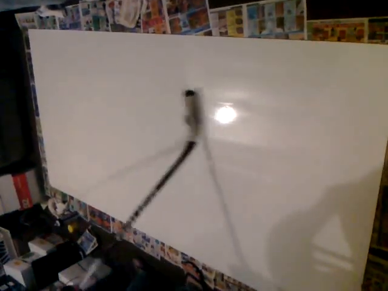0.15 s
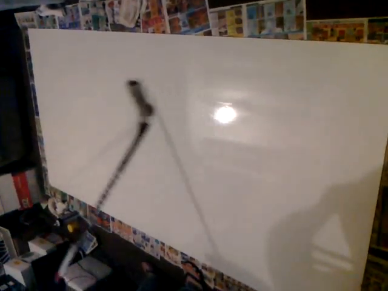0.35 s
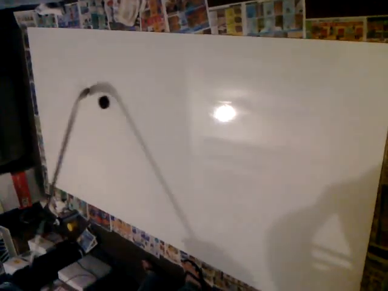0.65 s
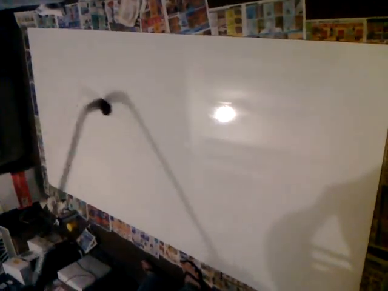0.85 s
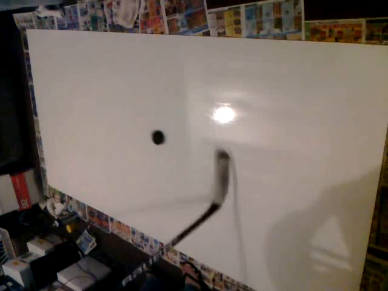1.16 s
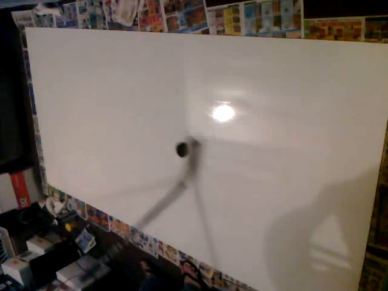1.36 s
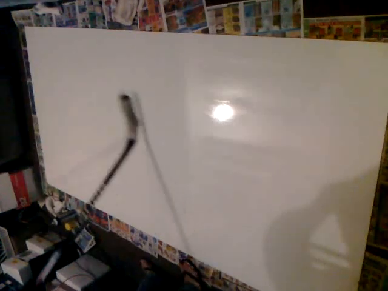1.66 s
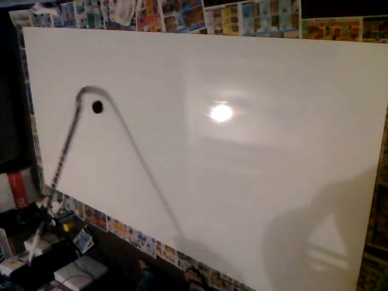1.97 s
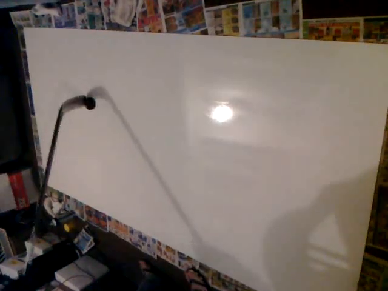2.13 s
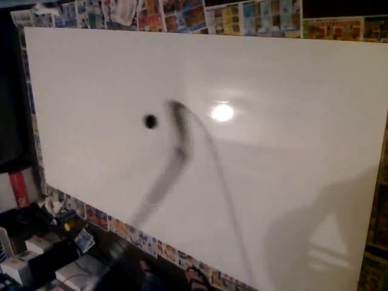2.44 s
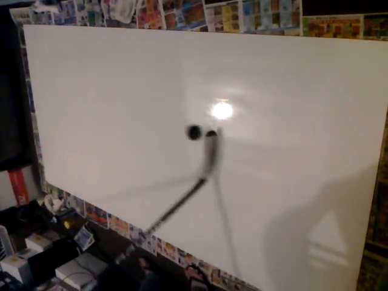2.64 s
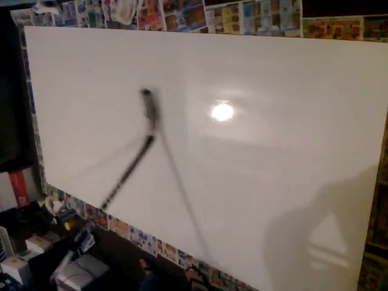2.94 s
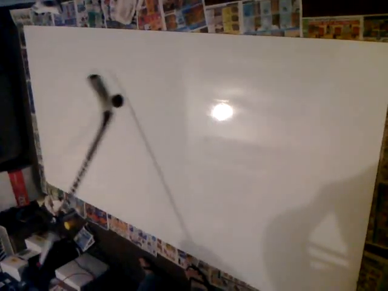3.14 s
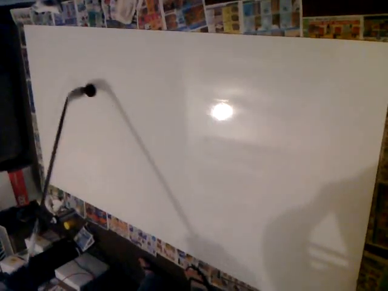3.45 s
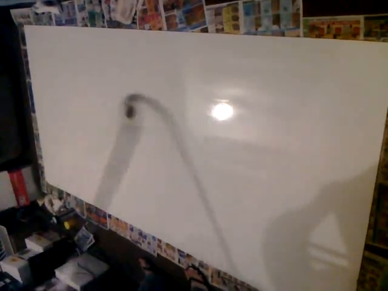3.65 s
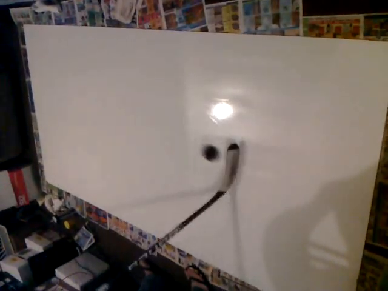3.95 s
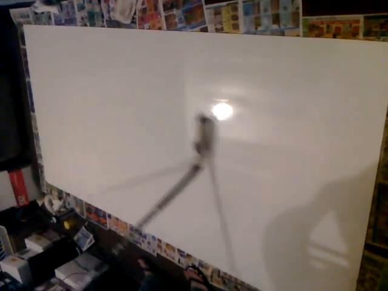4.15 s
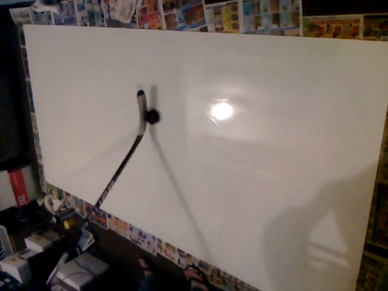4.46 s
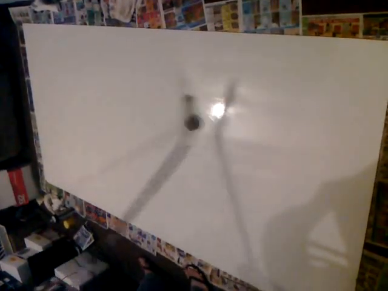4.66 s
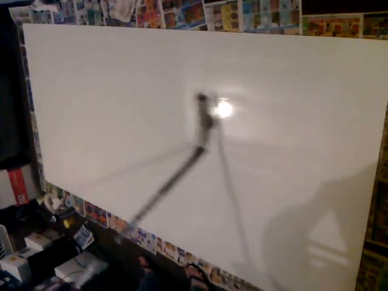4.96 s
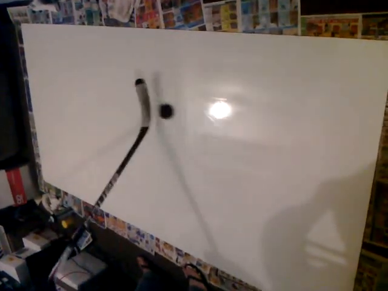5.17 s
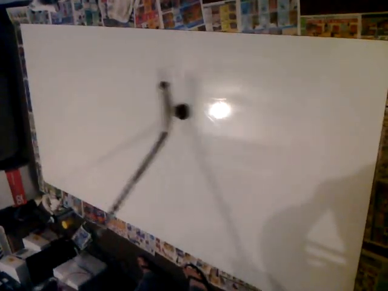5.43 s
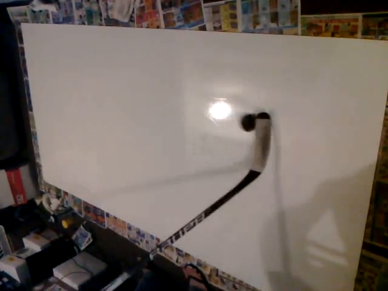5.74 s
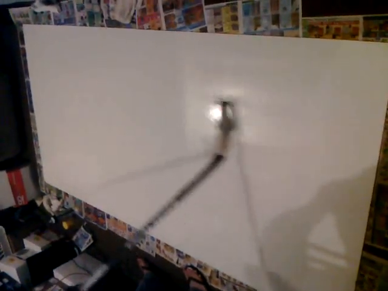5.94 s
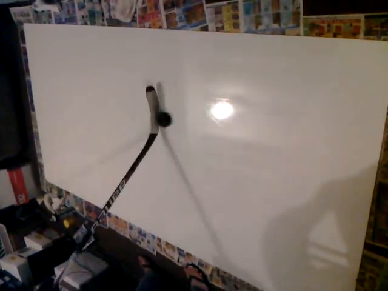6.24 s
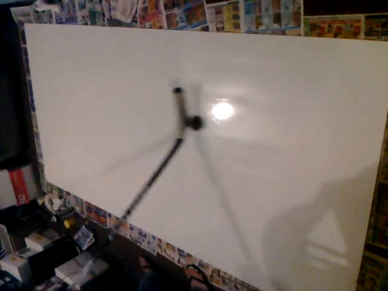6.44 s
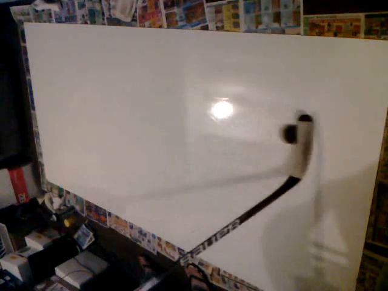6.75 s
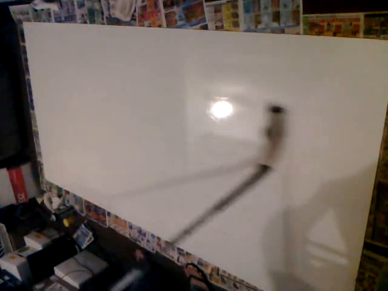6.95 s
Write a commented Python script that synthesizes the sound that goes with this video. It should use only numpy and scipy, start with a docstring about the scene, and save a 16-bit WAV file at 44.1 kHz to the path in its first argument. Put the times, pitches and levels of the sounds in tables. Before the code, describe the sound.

A hockey stick works a puck on a smooth practice board in a small room, over faint steady hiss and hum. Each hit is a low thump, woody clack and bright tick with a short room tail; puck knocks are slightly duller than board slaps, and some hits add a snap or tiny ring.

Hits open the scene and return around 0.6 and 0.8 seconds, followed by a gritty, hissing blade scrape near 1 second. A strong puck knock lands at 1.4, with more hits at 1.9, 2.2, 2.5, 2.7 and 3.4. The puck whispers faintly between them, and the blade scrapes around 2.4. Another scrape and a soft, deep board thud come near 3.6.

From 4 seconds the clacks come thicker, often in quick clusters, hardest at 4.4, 4.8 and 5.7. A pair follows at 6.3, and a final cluster just before 7 seconds.

```python
"""Stickhandling on a smooth practice board in a small room, over a faint hum and hiss.
The blade slaps the board, then knocks the puck: each blow is a low thump, a woody clack and a bright
tick with a short room tail. The blade's edge catches with a snap or a ring, the puck glides off, and
the blade scrapes after it in gritty friction. Now and then a heavy push flexes the board into a deep
thud. From about 4 s the blows come thicker, and the hardest slaps land."""
import sys
import numpy as np
from scipy import signal
from scipy.fft import rfft, irfft, next_fast_len
from scipy.io import wavfile
from scipy.ndimage import uniform_filter1d

SR = 44100
rng = np.random.default_rng(int(sys.argv[2]) if len(sys.argv) > 2 else 0)


def to_wav(sig):
    """Store sig (one row per channel, or 1-D mono) as 16-bit WAV at the path in sys.argv[1].

    Samples outside -1..1 are clipped; the rate is SR.
    """
    pcm = np.clip(np.atleast_2d(sig), -1, 1) * 32767
    pcm = np.round(pcm).astype(np.int16)
    wavfile.write(sys.argv[1], SR, pcm.T)  # frames by channels


N = 313110
BLOW = round(.32 * SR)   # samples in one blow with its tail

# Levels in the EQ curves and mode tables are relative: they set the colour only.
# room hiss: f/Hz, level/dB
HISS_EQ = [(20, -17), (60, -14.5), (130, -11.5), (180, -15), (250, -14), (380, -11), (900, -24),
           (3000, -30), (4500, -30), (7800, -24), (9500, -26.5), (11500, -38), (16000, -44)]
# mains hum and a thin electric whine: f/Hz, level/dB
HUM_TONES = [(59.6, -80), (119.5, -69.5), (15151, -87)]

# blade lands on the board: t/s, level/dB, softness (0-1), thump f/Hz
SLAPS = [(-0.006, -29, 0.25, 407), (0.6328, -29, 0.2, 425), (0.813, -36.5, 0.01, 387),
         (0.853, -38.5, 0.09, 410), (1.9053, -30.5, 0.12, 445), (2.2392, -35.5, 0.16, 428),
         (2.2685, -37, 0.2, 446), (2.465, -33, .27, 457), (3.3662, -26.5, 0.18, 413),
         (3.515, -31.5, 0.4, 380), (3.568, -34, 0.31, 350), (4.0897, -25, 0.65, 423),
         (4.2591, -53.5, 0.42, 424), (4.4242, -23.5, 0.33, 430), (4.651, -43, 1, 394),
         (4.657, -35.5, 0.9, 389), (4.668, -33, 0.51, 410), (4.756, -36.5, 0.46, 422),
         (4.768, -33.5, .6, 420), (4.8051, -20, 0.27, 419), (5.0209, -47.5, .95, 408),
         (5.2562, -25.5, 0.36, 444), (5.3417, -36.5, .9, 422), (5.486, -41.5, 0.32, 393),
         (5.4975, -33.5, 0.5, 380), (5.559, -41, 0.9, 413), (5.7155, -22, 0.27, 415),
         (6.2581, -28.5, .72, 448), (6.509, -44.5, 0.86, 413), (6.7676, -26, 0.36, 418),
         (6.8428, -31, 0.34, 390), (6.9064, -32.5, 0.45, 467)]
# woody body of a slap: f/Hz, level/dB
SLAP_CLACK_EQ = [(150, -16), (500, 4.5), (750, -0.5), (1050, -3), (1600, 0.5), (2200, -4), (2850, -9),
                 (3500, -5.5), (4600, -15), (8000, -17), (15000, -47)]
# bright attack of the blade: f/Hz, level/dB
BLADE_TICK_EQ = [(800, -19), (2500, 0.5), (3400, 2), (4800, -2), (6500, -0.5), (8400, 3), (9500, -1.5),
                 (11000, -10.5), (13000, -23), (16000, -33)]
# low resonances of board and room: f/Hz, level/dB, t60/s
BOARD_MODES = [(187.7, -7, 0.159), (283.8, -12.5, 0.34), (321, -2.5, 0.22), (356.8, -1, 0.29),
               (420, 2, 0.22), (450.5, -4.5, 0.2), (467.4, -1.5, 0.37), (486, -14, 0.52)]

# blade meets the puck: t/s, level/dB, thump f/Hz
PUCK_KNOCKS = [(0.1107, -31.5, 454), (0.813, -38, 640), (1.4358, -22.5, 543), (1.483, -34.5, 545),
               (2.1826, -39.5, 655), (2.7334, -25, 532), (2.798, -40.5, 540), (4.0585, -24.5, 494),
               (4.868, -28, 462), (5.2964, -28, 500), (5.8296, -31.5, 478), (5.906, -32.5, 445),
               (6.2933, -28.5, 627)]
# duller, woodier body of a knock: f/Hz, level/dB
KNOCK_CLACK_EQ = [(200, -18), (550, 4), (850, -6), (1250, 0.5), (1850, -1), (2500, -5.5), (3500, -6.5),
                  (5000, -13.5), (15000, -58.5)]
# attack of a knock: f/Hz, level/dB
KNOCK_TICK_EQ = [(1000, -3.5), (3000, -11), (4200, -5.5), (5200, -4.5), (7800, -1), (9300, -5.5),
                 (11000, -17), (16000, -30.5)]

# the blade's hard edge catches: t/s, level/dB, snap's share of the energy (0-1)
EDGE_CATCHES = [(0.1111, -69, 0.1), (0.813, -37.5, 0.54), (1.289, -59.5, .95), (1.344, -54, 1),
                (2.1867, -43.5, 0.93), (3.5686, -71, 0.64), (4.4245, -40, 0.44), (4.659, -44, 1),
                (4.7678, -49, .6), (5.8294, -53, 0), (6.842, -46.5, 0.4)]
# ring of the stiff blade: f/Hz, level/dB, t60/s
BLADE_MODES = [(900, -9, .1), (1642, -2, 0.17), (1760, 7, 0.106), (2050, -15, 0.16), (2300, -15, 0.14),
               (2970, 0.5, 0.082), (3530, -4, .07), (3670, 4, 0.087), (4280, -1, .08)]

# puck slides freely: start t/s, length/s, relative level/dB
PUCK_GLIDES = [(0.22, 0.099, -54.5), (1.33, 0.1, -50.5), (1.58, 0.28, -57), (2.095, 0.08, -54),
               (2.914, 0.14, -60), (5.043, 0.018, -64)]
# whisper of puck on board: f/Hz, level/dB
GLIDE_EQ = [(250, -23), (500, 5.5), (900, -8.5), (1500, -9), (3500, -16), (5800, -12.5), (8400, -8.5),
            (10500, -19), (14000, -38)]

# blade drags: start t/s, length/s, top speed t/s, relative pressure level/dB, relative hiss level/dB
BLADE_SCRAPES = [(0.887, 0.3, 1.035, -49.5, -42), (2.254, 0.13, 2.38, -51, -43.5),
                 (2.498, .04, 2.57, -50, -47.5), (3.531, 0.3, 3.72, -48.5, -43),
                 (5.052, .2, 5.19, -93, -59.5)]
# bright hiss of a scrape: f/Hz, level/dB
SCRAPE_HISS_EQ = [(3000, -9), (5000, -8.5), (7000, -5.5), (8400, -2), (9800, -8), (11400, -17.5),
                  (16000, -34.5)]
# coarse midrange grit of a scrape: f/Hz, level/dB
SCRAPE_GRIT_EQ = [(700, -18), (1050, -5), (1450, 1.5), (2100, -0.5), (2700, -3.5), (3600, -3.5),
                  (5000, -11.5), (8000, -33.5), (16000, -60)]
# board rumbling under a scrape: f/Hz, level/dB
SCRAPE_RUMBLE_EQ = [(60, -12.5), (130, -10.5), (220, -11), (330, 8), (490, 12), (700, 5.5), (950, -3),
                    (1400, -22), (4000, -70)]

# the whole board flexes under a heavy push: t/s, level/dB
BOARD_THUDS = [(1.436, -52), (3.617, -42.5), (4.062, -60)]


def from_db(db):
    """Decibels to gain."""
    return np.exp(np.asarray(db) * (np.log(10) / 20))


def eq_gains(eq, size):
    """An EQ curve as gains on an FFT grid, rolled off below its first point."""
    hz, db = np.transpose(eq)
    grid = np.maximum(np.arange(size // 2 + 1) * SR / size, 1)
    low_cut = np.minimum(grid / hz[0], 1) ** 2
    return low_cut * from_db(np.interp(np.log(grid), np.log(hz), db))


def noise(eq, grit_db=0):
    """Coloured noise at rms 1; grit breaks it into grains of uneven size."""
    size = next_fast_len(N, real=True)
    grains = rng.standard_normal(size) * from_db(grit_db * np.clip(rng.standard_normal(size), -3, 3))
    coloured = irfft(rfft(grains) * eq_gains(eq, size), size)[:N]
    return coloured / coloured.std()


def room_tone(hiss_db=-67):
    """The bed: steady hiss, mains hum and a thin electric whine."""
    t = np.arange(N) / SR
    hum = sum(np.sqrt(2) * from_db(db) * np.sin(2 * np.pi * (hz * t + rng.random()))
              for hz, db in HUM_TONES)
    return from_db(hiss_db) * noise(HISS_EQ) + hum


def add(track, s, sound):
    """Mixes a sound in at s seconds."""
    at = int(round(s * SR))
    part = sound[max(-at, 0):N - at]
    track[max(at, 0):max(at, 0) + len(part)] += part


def unit_blow(x):
    """Scales a blow to the energy of 20 ms at rms 1."""
    return x / np.sqrt(np.sum(x ** 2) / (SR / 50) + 1e-20)


def click(eq, size=2048):
    """The tightest transient with this colour: a minimum-phase click."""
    cepstrum = irfft(np.log(eq_gains(eq, size) + 1e-4))
    cepstrum[1:size // 2] *= 2
    cepstrum[size // 2 + 1:] = 0
    return irfft(np.exp(rfft(cepstrum)))


def thump(hz, spread, size=4096):
    """A heavily damped swing of the board; more spread makes it shorter."""
    band = np.array([1 / (1 + spread), 1 + spread]) * hz
    return signal.sosfilt(signal.butter(2, band, "band", fs=SR, output="sos"), signal.unit_impulse(size))


def in_room(pulse, wet_db, t60, build_s, uneven_db=0, wall_hz=11500, grain_hz=180):
    """The direct pulse and a wash of ringing and reflections, new for every spot on the board."""
    t = np.arange(BLOW) / SR
    hz = np.arange(BLOW // 2 + 1) * SR / BLOW
    # each contact point favours other resonances, and the walls swallow the very top
    favour = np.interp(hz / grain_hz, np.arange(BLOW), np.clip(rng.standard_normal(BLOW), -2, 2))
    colour = from_db(uneven_db * favour) / np.sqrt(1 + (hz / wall_hz) ** 6)
    wash = irfft(rfft(rng.standard_normal(BLOW)) * colour, BLOW)
    # early on, single reflections still stand out
    lumps = from_db(2.5 * np.exp(-t / 0.045) * np.clip(rng.standard_normal(BLOW), -3, 3))
    lumps /= np.sqrt(uniform_filter1d(lumps ** 2, size=200))
    echoes = wash * lumps * from_db(-60 * t / t60) * (1 - np.exp(-t / build_s))
    direct = unit_blow(np.pad(pulse, (0, BLOW - len(pulse))))
    wet = unit_blow(signal.fftconvolve(pulse, echoes)[:BLOW])
    return unit_blow(direct + from_db(wet_db) * wet)


def ring(modes, vary_db=3.0, build_s=0.002):
    """Decaying resonances; every blow wakes them with strengths and phases of its own."""
    t, tone = np.arange(BLOW) / SR, 0
    for hz, db, t60 in modes:
        decay = from_db(db + vary_db * rng.normal() - 60 * t / t60)
        tone += decay * np.sin(2 * np.pi * (hz * t + rng.random()))
    return unit_blow(tone * (1 - np.exp(-t / build_s)))


def blade_slaps(hardening=0.52, rebound_s=0.021, rebound_loss_db=21.5):
    """The flat of the blade slaps the board down: thump, clack and tick, then one weak rebound."""
    out, clack = np.zeros(N), click(SLAP_CLACK_EQ)
    for s, thump_db, softness, hz in SLAPS:
        # a soft landing loses clack, and still more tick
        clack_db = thump_db - 5 - 20 * softness
        tick_db = thump_db - 5 - 30.5 * softness
        # a harder blow has a shorter contact, so its tick is brighter
        db_per_octave = hardening * max(tick_db + 44.5, -6)
        pivot_hz = BLADE_TICK_EQ[0][0]
        tick = click([(f, db + db_per_octave * np.log2(f / pivot_hz)) for f, db in BLADE_TICK_EQ])
        swing = thump(hz, spread=0.37)
        low = in_room(swing, wet_db=-1.5, t60=0.23, build_s=0.0015) + from_db(-4.0) * ring(BOARD_MODES)
        mid = in_room(clack, wet_db=2.0, t60=0.34, build_s=0.00049, uneven_db=1.5)
        top = in_room(tick, wet_db=15.0, t60=0.24, build_s=0.00023, uneven_db=0.5)
        add(out, s, from_db(thump_db) * unit_blow(low) + from_db(clack_db) * mid + from_db(tick_db) * top)
        rebound = from_db(thump_db - rebound_loss_db) * unit_blow(swing)
        add(out, s + rebound_s * (.5 + rng.random()), rebound)
    return out


def puck_knocks(typical_hz=486, typical_db=-29):
    """Blade against rubber: a higher, shorter thump than a slap, swinging the other way first."""
    out, clack, tick = np.zeros(N), click(KNOCK_CLACK_EQ), click(KNOCK_TICK_EQ)
    for s, thump_db, hz in PUCK_KNOCKS:
        # a shorter contact pitches the thump higher, clacks more and wakes the board less
        octaves = np.log2(hz / typical_hz)
        clack_db = thump_db - 9 + 18 * octaves
        board_db = -3.0 - 14.4 * octaves
        tick_db = -43.5 + 1.81 * (thump_db - typical_db)   # a harder knock ticks more
        low = in_room(thump(hz, spread=0.56), wet_db=-3.0, t60=0.3, build_s=0.0028)
        low = unit_blow(low + from_db(board_db) * ring(BOARD_MODES))
        mid = in_room(clack, wet_db=9.0, t60=0.29, build_s=0.00072, uneven_db=4.0)
        top = in_room(tick, wet_db=6.5, t60=0.28, build_s=0.0007, uneven_db=-3.5)
        add(out, s, -(from_db(thump_db) * low + from_db(clack_db) * mid + from_db(tick_db) * top))
    return out


def edge_catches(crunch_decay_s=0.00083):
    """A hard, tiny contact: a bright snap blended with the ring of the stiff blade."""
    out, tick = np.zeros(N), click(BLADE_TICK_EQ)
    t = np.arange(SR // 50) / SR
    for s, db, snap_share in EDGE_CATCHES:
        crunch = signal.fftconvolve(tick, rng.standard_normal(len(t)) * np.exp(-t / crunch_decay_s))
        snap = in_room(crunch, wet_db=-1.5, t60=0.15, build_s=0.0069)
        ringing = ring(BLADE_MODES, vary_db=4.5, build_s=0.00017)
        add(out, s, from_db(db) * (np.sqrt(snap_share) * snap + np.sqrt(1 - snap_share) * ringing))
    return out


def grip_flutter(rate_hz=87, depth_db=0.95):
    """Gain of a sliding contact whose grip flutters at random."""
    knots = rng.standard_normal(N // 50)
    return from_db(depth_db * np.interp(np.arange(N) / SR * rate_hz, np.arange(len(knots)), knots))


def stroke(t, length_s, attack_s, release_db_per_s):
    """Envelope of one slide from t = 0: it sets in, holds and dies away."""
    return np.clip(t / attack_s, 0, 1) * from_db(-release_db_per_s * np.maximum(t - length_s, 0))


def puck_glides(slowing_db_per_s=25):
    """The free puck's friction: a grainy whisper that fades as it slows."""
    t, envelope = np.arange(N) / SR, np.zeros(N)
    for s, length_s, db in PUCK_GLIDES:
        contact = stroke(t - s, length_s, attack_s=0.019, release_db_per_s=128)
        envelope += contact * from_db(db - slowing_db_per_s * np.maximum(t - s, 0))
    return from_db(-5.5) * envelope * noise(GLIDE_EQ, grit_db=5.0)


def blade_scrapes(swing_db_per_s=58.5):
    """Countless tiny slips of the dragged blade: hiss rides its speed, grit and rumble its pressure."""
    t, pressure, speed = np.arange(N) / SR, np.zeros(N), np.zeros(N)
    for s, length_s, fastest_s, pressure_db, hiss_db in BLADE_SCRAPES:
        contact = stroke(t - s, length_s, attack_s=0.049, release_db_per_s=158)
        pressure += contact * from_db(pressure_db)
        speed += contact * from_db(hiss_db - swing_db_per_s * np.abs(t - fastest_s))
    hiss = from_db(-4.5) * noise(SCRAPE_HISS_EQ, grit_db=1.5)
    grit = from_db(-4.0) * noise(SCRAPE_GRIT_EQ, grit_db=5.0)
    rumble = from_db(-1.5) * noise(SCRAPE_RUMBLE_EQ)
    return speed * hiss + pressure * (grit + rumble)


def board_thuds():
    """The whole board flexes under a push: a soft, deep bump."""
    out, swing = np.zeros(N), thump(hz=123, spread=0.92)
    for s, db in BOARD_THUDS:
        add(out, s, from_db(db) * in_room(swing, wet_db=0.0, t60=0.81, build_s=0.0075))
    return out


def scene():
    """Mono mix of blows and friction over the room tone."""
    blows = blade_slaps() + puck_knocks() + edge_catches() + board_thuds()
    friction = grip_flutter() * (blade_scrapes() + puck_glides())
    return (blows + friction + room_tone())[None]


def record(dry):
    """A steep high cut at 16.1 kHz."""
    return signal.sosfilt(signal.ellip(10, .1, 80, 16100, fs=SR, output="sos"), dry)


dry = scene()
out = record(dry)
to_wav(out)
```